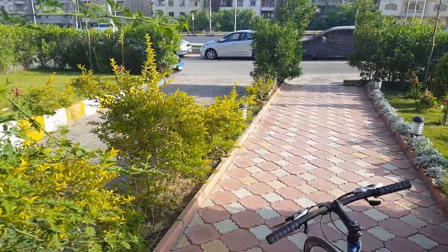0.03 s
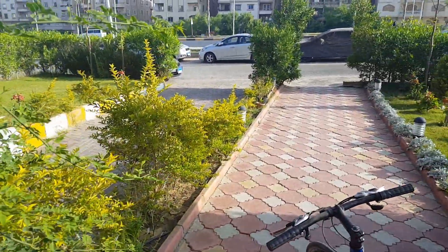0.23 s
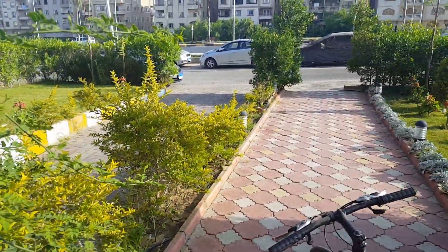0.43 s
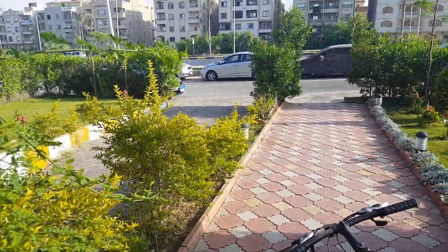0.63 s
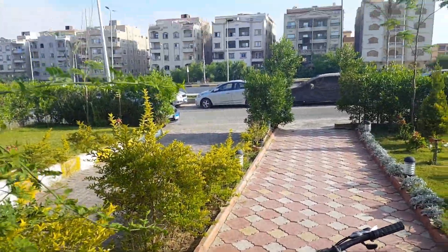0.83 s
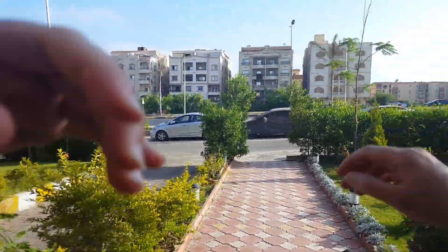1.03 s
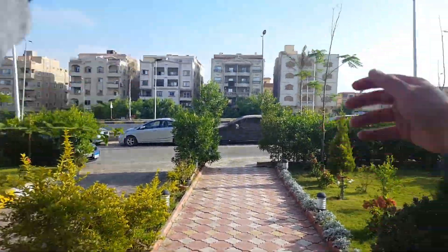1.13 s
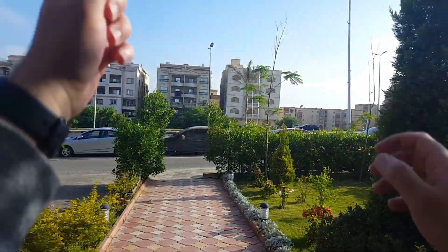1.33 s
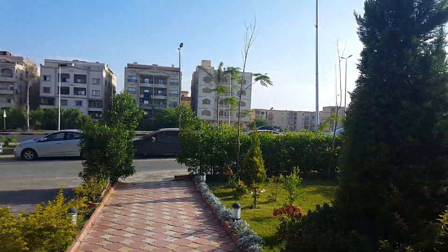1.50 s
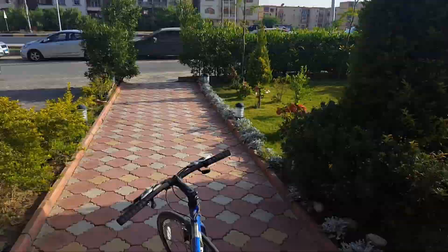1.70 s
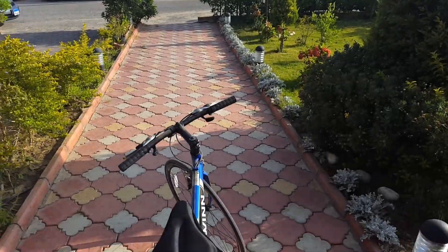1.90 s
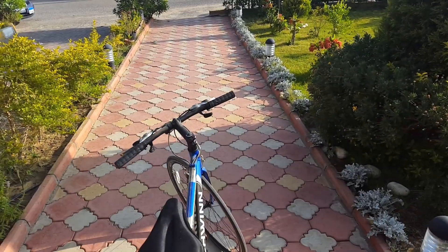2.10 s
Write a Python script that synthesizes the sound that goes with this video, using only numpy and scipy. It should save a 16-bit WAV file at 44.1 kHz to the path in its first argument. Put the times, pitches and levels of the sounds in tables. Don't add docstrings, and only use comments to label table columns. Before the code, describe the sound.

Close stereo capture outdoors: a metal gate crashes into its frame, its bars ring briefly, the bolt scrapes and loose parts rattle, then quiet distant traffic and a soft sleeve rustle.

```python
import sys
import numpy as np
from scipy import signal
from scipy.fft import rfft, irfft
from scipy.io import wavfile
from scipy.ndimage import uniform_filter1d

SR = 44100
rng = np.random.default_rng(int(sys.argv[2]) if len(sys.argv) > 2 else 0)


def inscribe(sig):
    pcm = np.round(np.clip(np.atleast_2d(sig).T, -1, 1) * 32767)
    wavfile.write(sys.argv[1], SR, pcm.astype(np.int16))


def ratio_of_db(decibels):
    return 10 ** (np.asarray(decibels, float) / 20)


N = 94815

# freq_hz, density_db_per_hz
HUM_SPECTRUM = [(18, -44), (30, 3), (129, 4.5), (359, -8), (621, -3.5), (1240, -6.5), (2860, -19.5),
                (3550, -26), (9000, -42.5), (11700, -84), (19800, -120)]
# time_s, level_db, panel_share_db
SHUDDER = [(0.14, -63, -4), (0.21, -26.5, -2), (0.24, -21, 4.5), (0.36, -13.5, -3), (0.42, -18.5, 2),
           (0.51, -17, -8.5), (0.55, -17.5, -5), (0.72, -22.5, -11), (0.89, -30, -2), (0.96, -27.5, 2.5),
           (1.2, -29, -9.5), (1.36, -30, -3.5), (1.61, -33, -10), (2.05, -41.5, -4.5), (2.12, -36, -15),
           (2.15, -49, 1)]
# freq_hz, width_hz, level_db
LEAF_MODES = [(70.3, 31, -7.5), (86.7, 42, -6.5), (118, 28.7, -4.5), (140.2, 9.5, 0.5), (171, 15.5, 0.5),
              (218.3, 13.5, 0)]
# freq_hz, width_hz, level_db
PANEL_MODES = [(251, 21, -4.5), (298.3, 11.8, 1.5), (342.1, 39.5, -2), (424.8, 17.2, -4), (487.6, 10, -2.5),
               (613, 21.6, -8), (756, 29, -16), (910, 68, -17.5)]
# freq_hz, density_db_per_hz
BOOM_SPECTRUM = [(15, -16), (25, -26), (124, 2), (212, -0.5), (441, -9), (486, -12), (701, -20),
                 (1050, -22), (2500, -39.5), (3250, -42), (5500, -120)]
# start_s, peak_db, tilt_db_per_octave, ring_t60_s, left_right_db
BLOWS = [(0.1707, -24, -0.2, 0.17, 0.5), (0.2338, -13.5, 2, 0.14, 6.5), (0.2654, -9, -5, 0.072, 0),
         (0.2925, -12, 3, 0.075, 0.5), (0.3494, -26, 0, 0.044, 7), (0.4071, -17.5, -1.7, 0.14, 0.5),
         (0.4451, -21.5, -1.1, 0.12, 2.5), (0.507, -17.5, -2.5, 0.11, -3), (0.5288, -18.5, -2.5, 0.15, 3.5),
         (0.616, -27, -7, .05, 3.5), (0.6526, -42, 1.5, 0.24, 2.0), (0.6914, -50, 11, 0.087, 4),
         (0.7412, -27.5, -5.5, 0.069, -3.5)]
# start_s, peak_db, tilt_db_per_octave, ring_t60_s, left_right_db
RATTLES = [(0.839, -25.5, 0.7, 0.045, 1), (0.848, -28.5, -1.5, .05, 1), (0.8972, -24.5, -2, 0.078, -4),
           (0.9244, -25, -5, 0.24, 6), (1.005, -41.5, 2, 0.065, 22), (1.0241, -38, -2, 0.029, -10.5),
           (1.1002, -38.5, 1, 0.12, -5), (1.1593, -37, 10, 0.015, 3), (1.2294, -40.5, 0.5, .04, 7),
           (1.259, -33, -1, 0.031, 0), (1.3192, -28, -5.5, 0.035, -8), (1.3332, -25, -6.5, 0.072, -5),
           (1.4135, -30, -3, 0.068, -1), (1.2442, -27, 1, 0.092, -2.5), (1.278, -34, -9, 0.078, 5),
           (1.584, -31.5, -3.3, 0.19, -0.5)]
# freq_hz, density_db_per_hz
CLACK_SPECTRUM = [(290, -19.5), (500, -6), (1280, -9.5), (2140, -10), (3590, -17), (4480, -17.5),
                  (9500, -28.5), (16000, -46.5)]
# freq_hz, width_hz, level_db
BAR_MODES = [(903, 70, 5), (1354, 34, -9), (1570, 47, -6), (1900, 50, -1.5), (2080, 84, -8), (2567, 53, 5),
             (3060, 160, 2), (3900, 160, 5), (4170, 120, 4), (4850, 140, 3), (5670, 120, -2),
             (7080, 150, -1.5)]
# start_s, pitch_hz, level_db, t60_s
RINGS = [(.234, 3600, -28.5, 0.13), (0.236, 6400, -28, 0.075), (.262, 950, -21.5, 0.15),
         (.29, 783, -28, 0.22), (0.528, 6800, -37, 0.041), (0.528, 6500, -32.5, 0.037),
         (.236, 2800, -30, 0.13), (.25, 1910, -30, 0.13), (.294, 3040, -28, 0.12), (.34, 660, -31, 0.13),
         (1.586, 5800, -47, 0.047), (0.2, 2300, -38, .1), (.898, 3700, -35, 0.055), (.898, 5100, -39, .06),
         (.925, 6900, -41, 0.043), (.845, 5200, -39, 0.059), (1.326, 1100, -44, .2), (1.33, 3940, -47, .05),
         (.185, 215, -27, .3), (.345, 200, -19, .25), (.52, 170, -22, .3), (.325, 1050, -27, .2),
         (.27, 1320, -27, .1), (1.332, 1900, -40, .06), (1.262, 4900, -44, .05), (1.326, 5650, -42.5, .08),
         (.51, 1300, -38, 0.1), (.895, 730, -31, 0.16), (.894, 1190, -30.5, 0.1),
         (0.896, 1440, -31.5, 0.11), (.98, 4430, -34, 0.043), (1.024, 5650, -46, 0.11),
         (1.244, 5500, -42, 0.056), (1.25, 930, -32.5, 0.069), (1.326, 800, -31.5, 0.27),
         (1.326, 870, -35, 0.18), (1.326, 1630, -35, 0.17)]
# loudest_s, level_db, tilt_db_per_octave, rise_s, fall_t60_s
GRINDS = [(.31, -12, -6, .012, 0.26), (.901, -20, -3.5, .022, 0.078), (.985, -28, 2.5, 0.036, 0.062),
          (1.15, -44, 11, 0.07, 0.7), (1.331, -21.5, -5, .022, 0.17), (1.425, -27, -5, 0.03, 0.35),
          (1.53, -41, 2, 0.06, 0.4), (.96, -21.5, -11, .04, 0.08), (0.38, -35, 5, 0.015, .1),
          (1.4, -42, 1.5, .04, 0.59), (1.21, -46, 7, 0.023, .15), (.8, -50, 2, 0.034, 0.11),
          (1.265, -35.5, -2, .012, .12), (.94, -33.5, -5.5, .02, .15)]
# time_s, level_db
SWISH = [
    (1.8, -71),
    (1.83, -51.5),
    (1.9, -48),
    (1.99, -45),
    (2.15, -49.5),
]
# freq_hz, density_db_per_hz
CLOTH_SPECTRUM = [(350, -21), (600, -29), (1010, 0), (1510, -14), (2050, -6), (4010, -11), (7820, -23),
                  (11000, -51), (14300, -81), (22000, -120)]
# freq_hz, correlation
LIKENESS = [(30, 0.95), (60, 0.96), (130, 0.98), (290, 0.87), (500, 0.51), (800, 0.19), (1410, -0.27),
            (3100, 0.095), (15000, -0.0067)]
# freq_hz, left_right_db
PORTS = [(60, -0.2), (380, 0.5), (950, 0.5), (5500, -2.5), (7500, 4), (9500, 5.5), (12000, 0.5), (15000, 1)]
# freq_hz, gain_db
CAPSULE = [(9000, -0.15), (9800, -5), (10500, -10), (11500, -2), (13500, 1.5), (16000, 2)]

HUM_DB = -40
BOOM_DB, LEAF_DB, PANEL_DB = -2, -3.5, -1
DEEP_HZ, DEEP_DB, DEEP_DB_PER_S = 112, -5, 7.5
SETTLE_S, SETTLE_DB = 1.782, -2
CLACK_DB, TICK_DB = -7.5, 0
YARD_DB, YARD_T60_S = -4.5, 0.87
RISE_S, TICK_DECAY_S, CHATTER_S = 0.00075, 0.00073, 0.01
GRIT_PER_S, GRIT_DB = 2800, -1
CLUMPS_PER_S, CLUMP_DB = 200, 3.3
BUMP_HZ, BUMP_DB = 300, 1.2
BEAT_SHARE = 0.027
GRIND_PAN_DB = -1.5
SWISH_DB, FLICKER_DB = 5.5, 0.64
SELF_NOISE_DB, EDGE_HZ = -68.5, 15800
GATE_DB, GATE_HZ, GATE_FLOOR_DB, GATE_CHANCE_DB = -3, 9500, -60, 9
LEFT_RIGHT = np.array([[0.5], [-0.5]])


def evened(x):
    return x / np.sqrt(np.mean(x ** 2) + 1e-20)


def read(points, hz):
    f, value = np.transpose(points)
    return np.interp(np.log(hz + 1), np.log(f + 1), value)


def curve(table, axis):
    rows = np.array(table)
    return np.interp(np.arange(N) / SR, rows[:, 0], rows[:, axis])


def shaped(x, gain):
    size = x.shape[-1]
    return irfft(rfft(x) * gain(np.fft.rfftfreq(size, 1 / SR)), size)


def peaks(modes, hz, narrow):
    power = 0
    for mode_hz, width_hz, db in modes:
        offset = 2 * (hz - mode_hz) / (width_hz * narrow)
        power = power + ratio_of_db(db) ** 2 / (1 + offset ** 2) ** 2
    return np.sqrt(power)


def wander(size, width):
    rough = uniform_filter1d(rng.standard_normal(size), max(round(width), 1))
    return evened(uniform_filter1d(rough, max(round(width / 2), 1)))


def noise(gain, size):
    def same(hz):
        return np.clip(read(LIKENESS, hz), -1, 1)

    left, other = rng.standard_normal((2, size))
    right = shaped(left, same) + shaped(other, lambda hz: np.sqrt(1 - same(hz) ** 2))
    return evened(shaped(np.array([left, right]), gain))


def placed(sounds):
    out = np.zeros((2, 2 * N))
    for start_s, sound in sounds:
        out[:, round(start_s * SR):][:, :sound.shape[1]] += sound
    return out[:, :N]


def traffic():
    swell_db = 0.8 * wander(N, 6000)
    return ratio_of_db(HUM_DB + swell_db) * noise(lambda hz: ratio_of_db(read(HUM_SPECTRUM, hz)), N)


def leaf():
    t = np.arange(N) / SR
    level_db = curve(SHUDDER, axis=1) - 60 * (t < SHUDDER[0][0])
    level_db = level_db + SETTLE_DB * np.clip((t - SETTLE_S) * 100, 0, 1)
    low = ratio_of_db(LEAF_DB) * noise(lambda hz: peaks(LEAF_MODES, hz, 1.0), N)
    low = low + ratio_of_db(BOOM_DB) * noise(lambda hz: ratio_of_db(read(BOOM_SPECTRUM, hz)), N)
    deep = shaped(low, lambda hz: 1 / (1 + (hz / DEEP_HZ) ** 6))
    low = low + deep * (ratio_of_db(DEEP_DB + DEEP_DB_PER_S * t) - 1)
    panel_db = PANEL_DB + curve(SHUDDER, axis=2)
    panels = ratio_of_db(panel_db) * noise(lambda hz: peaks(PANEL_MODES, hz, 1.0), N)
    return ratio_of_db(level_db) * (low + panels)


def clack(db, tilt_db, t60_s, pan_db, rise_s):
    size = 12288
    t = np.arange(size) / SR - rise_s
    after = np.maximum(t, 0)
    bumps_db = BUMP_DB * wander(size // 2 + 1, BUMP_HZ * size / SR)

    def colour(hz):
        tilted_db = read(CLACK_SPECTRUM, hz) + tilt_db * np.log2((hz + 300) / 4000)
        return ratio_of_db(tilted_db + bumps_db) * np.hypot(1, peaks(BAR_MODES, hz, 0.5))

    hiss = noise(colour, size)
    grit_db = GRIT_DB * wander(size, SR / GRIT_PER_S)
    clump_db = CLUMP_DB * wander(size, SR / CLUMPS_PER_S)
    grit = evened(ratio_of_db(grit_db + clump_db))
    hold_s = min(CHATTER_S, t60_s / 6)
    fall = ratio_of_db(-60 * np.maximum(t - hold_s, 0) / max(t60_s, 0.01))
    tick = ratio_of_db(TICK_DB) * (rise_s <= RISE_S) * np.exp(-after / TICK_DECAY_S)
    far = shaped(hiss[:, ::-1], lambda hz: 1 / (1 + hz / 5000))
    yard = far * ratio_of_db(YARD_DB - 60 * after / YARD_T60_S) * (1 - t / t[-1])
    onset = np.minimum(t / rise_s + 1, 1) ** 0.87
    return (hiss * (grit * fall + tick) + yard) * onset * ratio_of_db(db + CLACK_DB + LEFT_RIGHT * pan_db)


def blows_and_rattles():
    return placed([(start_s, clack(*row, RISE_S)) for start_s, *row in BLOWS + RATTLES])


def bar(pitch_hz, db, t60_s):
    t = np.arange(8192) / SR
    phase = 2 * np.pi * rng.random((2, 4, 1))
    mode_hz = pitch_hz * (1 + BEAT_SHARE * rng.uniform(-1, 1, (4, 1)))
    cluster = np.sin(2 * np.pi * mode_hz * t + phase).sum(axis=1)
    return cluster * ratio_of_db(db - 60 * t / t60_s) * np.minimum(t / 0.0022, 1)


def ringing_bars():
    return placed([(start_s, bar(*row)) for start_s, *row in RINGS])


def bolt_grinds():
    sounds = []
    for loudest_s, db, tilt_db, rise_s, t60_s in GRINDS:
        sound = clack(db, tilt_db, t60_s, GRIND_PAN_DB, max(rise_s, 2 * RISE_S))
        sounds.append((loudest_s - rise_s, sound))
    return placed(sounds)


def sleeve():
    flicker = evened(uniform_filter1d(rng.standard_normal(N), 300))
    on = np.arange(N) / SR > SWISH[0][0]
    level_db = curve(SWISH, axis=1) + SWISH_DB + FLICKER_DB * flicker
    return on * ratio_of_db(level_db) * noise(lambda hz: ratio_of_db(read(CLOTH_SPECTRUM, hz)), N)


def scene():
    return traffic() + leaf() + blows_and_rattles() + ringing_bars() + bolt_grinds() + sleeve()


def gated(x):
    hz, _, z = signal.stft(x, SR, nperseg=2048, noverlap=1536)
    power = abs(uniform_filter1d(abs(z) ** 2, size=8, axis=1))
    band_db = 10 * np.log10(power + 1e-20).mean(axis=0)
    cells = rng.standard_normal((len(hz) // 8 + 1, z.shape[2] // 4 + 1))
    chance = np.kron(cells, np.ones((8, 4)))[:len(hz), :z.shape[2]]
    usual_db = np.median(band_db[(hz > GATE_HZ) & (hz < EDGE_HZ)], axis=0)
    under_db = usual_db + GATE_DB + GATE_CHANCE_DB * chance - band_db
    shut = (under_db > 0) * (hz > GATE_HZ)[:, None]
    return signal.istft(z * ratio_of_db(GATE_FLOOR_DB * shut), SR, nperseg=2048, noverlap=1536)[1][:, :N]


def top_cut(x):
    return signal.sosfilt(signal.butter(12, 15800, fs=SR, output="sos"), x)


def record(dry):
    live = dry + ratio_of_db(SELF_NOISE_DB) * rng.standard_normal(dry.shape)
    ports = shaped(live, lambda hz: ratio_of_db(read(CAPSULE, hz) + LEFT_RIGHT * read(PORTS, hz)))
    rounded = 0.93 * np.tanh(ports / 0.89)
    edged = shaped(rounded, lambda hz: hz < EDGE_HZ)
    return top_cut(gated(edged))


dry = scene()
out = record(dry)
inscribe(out)
```